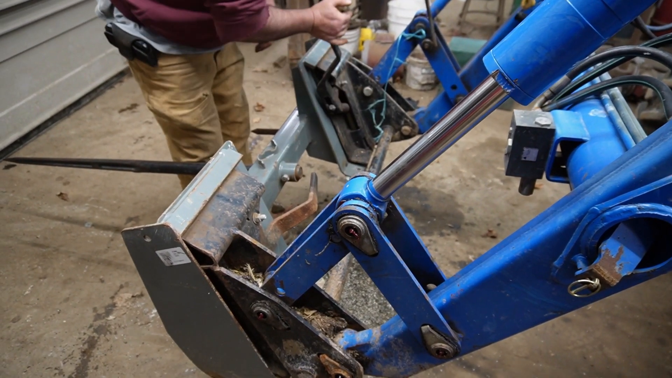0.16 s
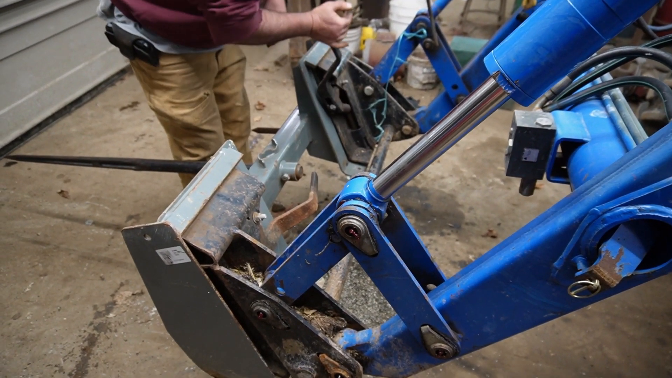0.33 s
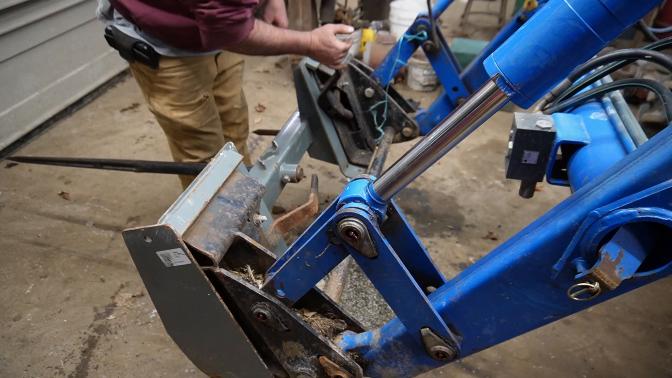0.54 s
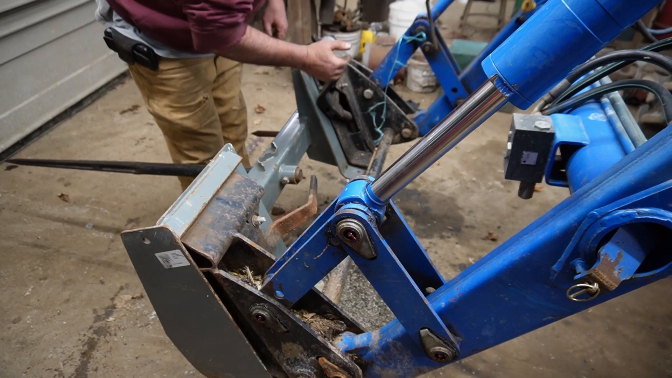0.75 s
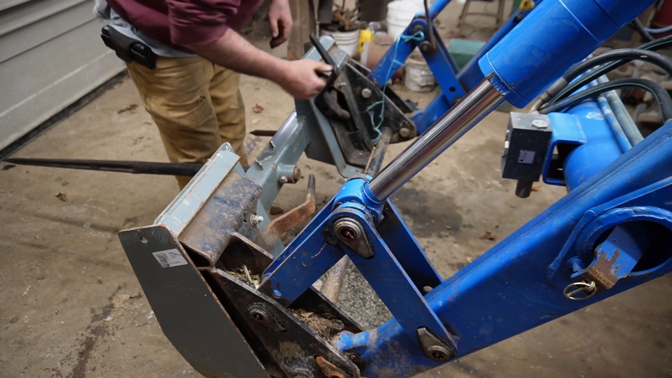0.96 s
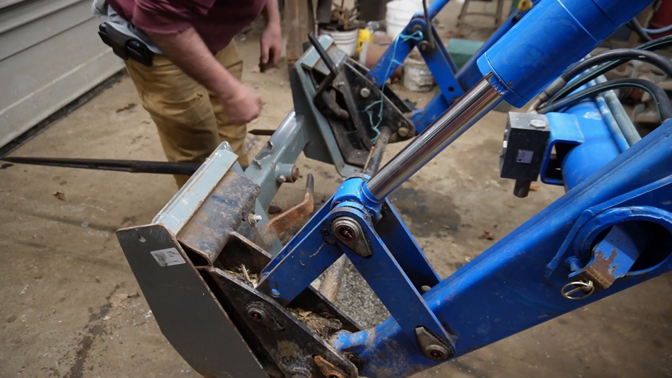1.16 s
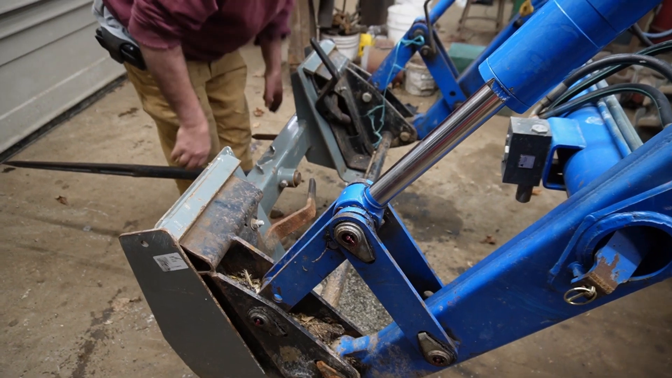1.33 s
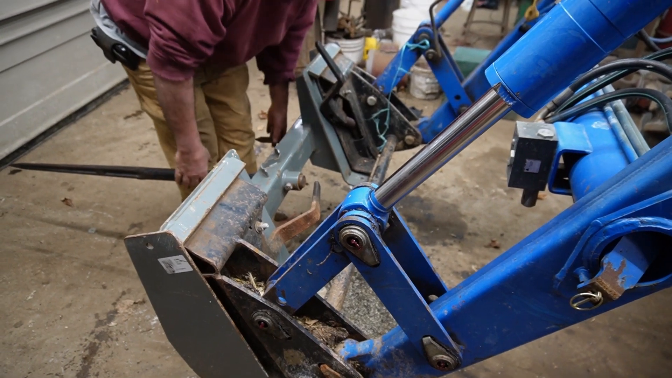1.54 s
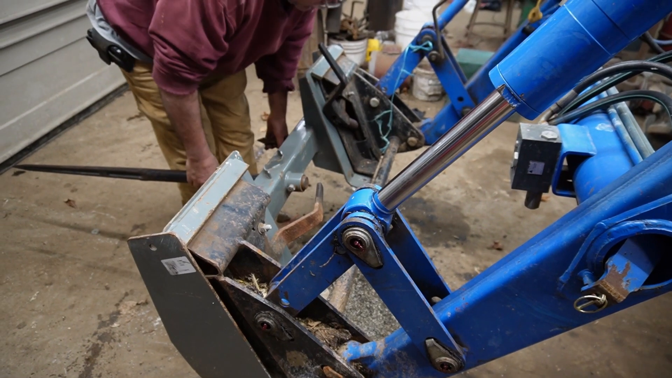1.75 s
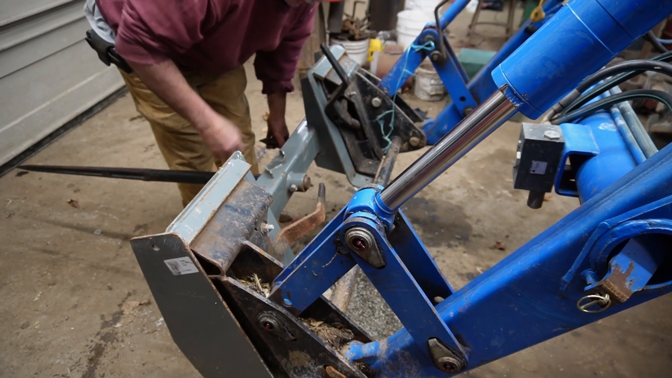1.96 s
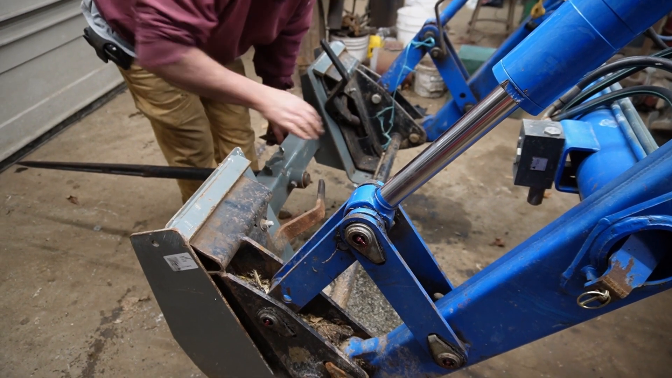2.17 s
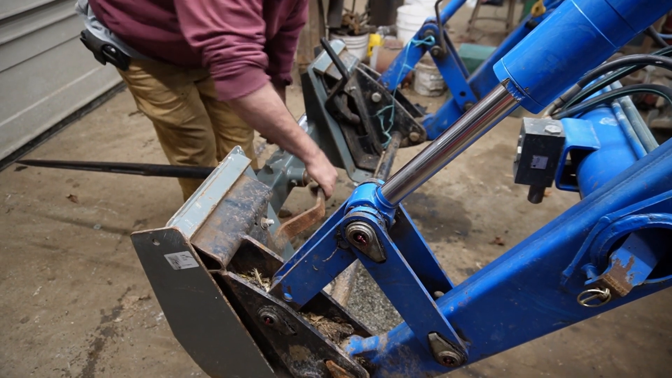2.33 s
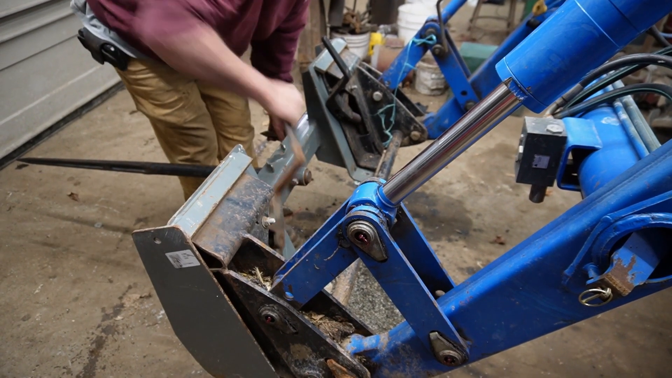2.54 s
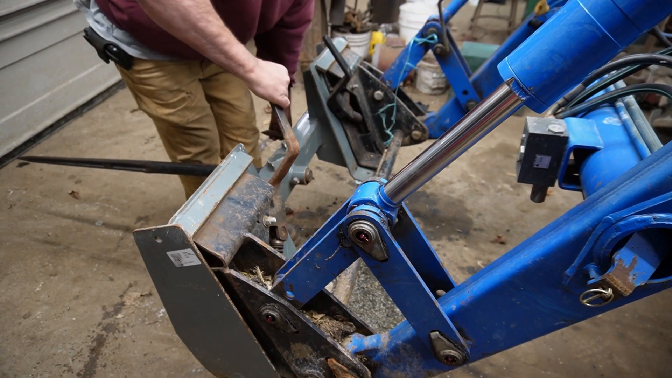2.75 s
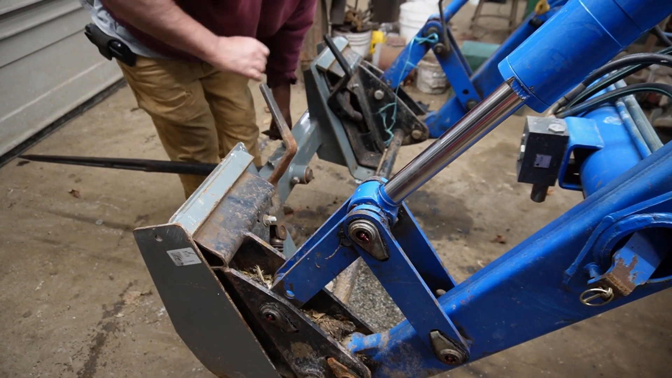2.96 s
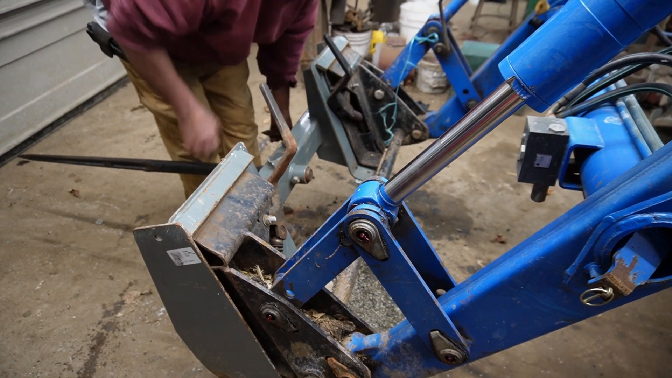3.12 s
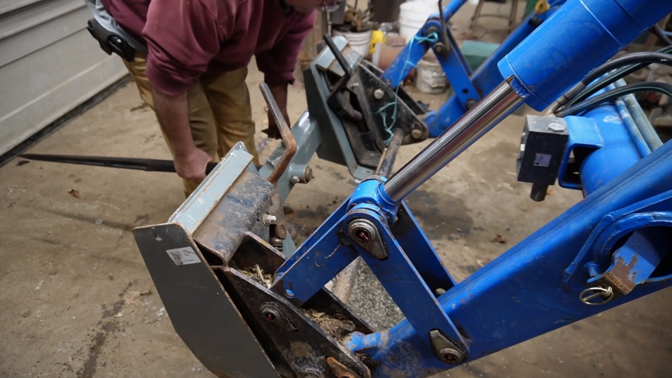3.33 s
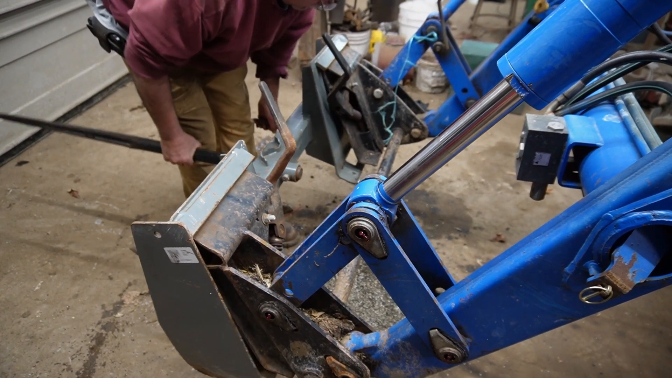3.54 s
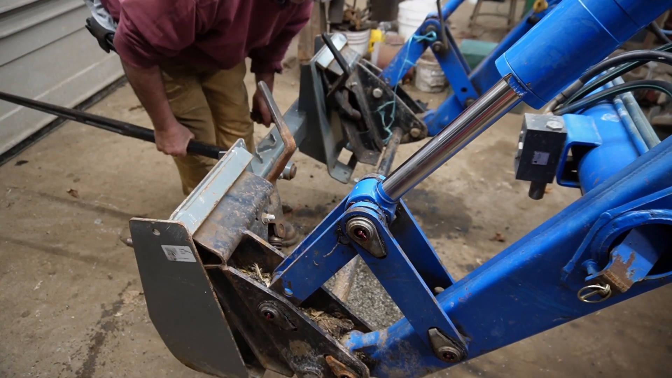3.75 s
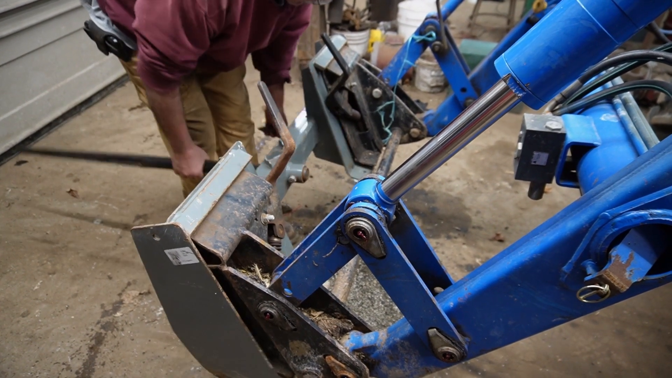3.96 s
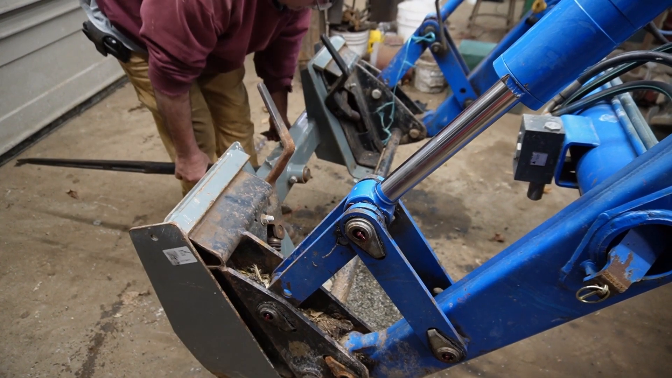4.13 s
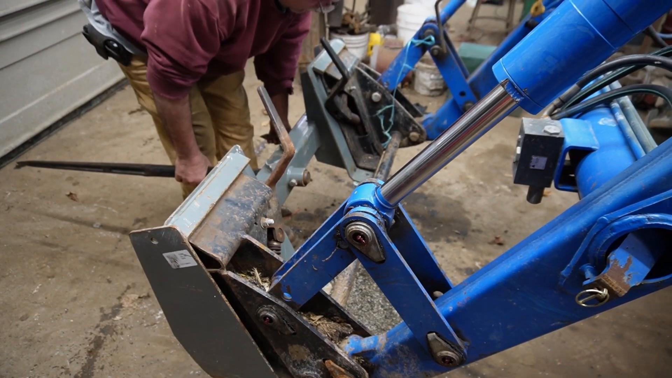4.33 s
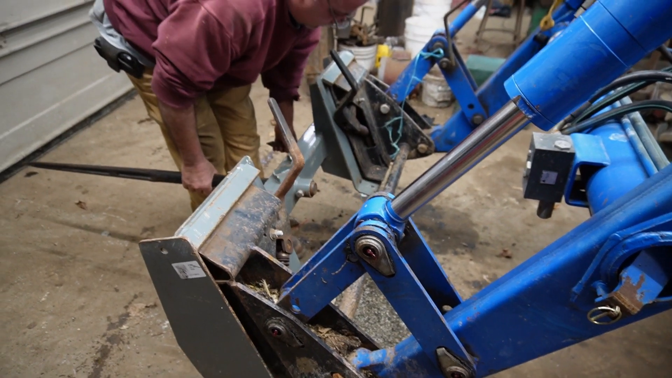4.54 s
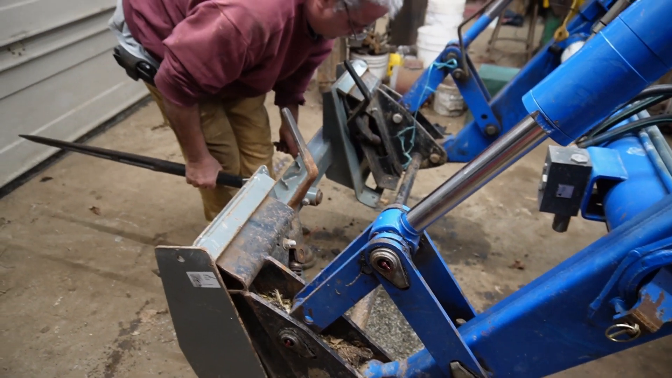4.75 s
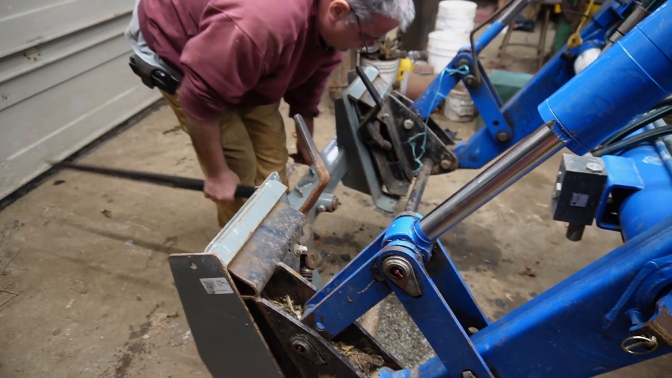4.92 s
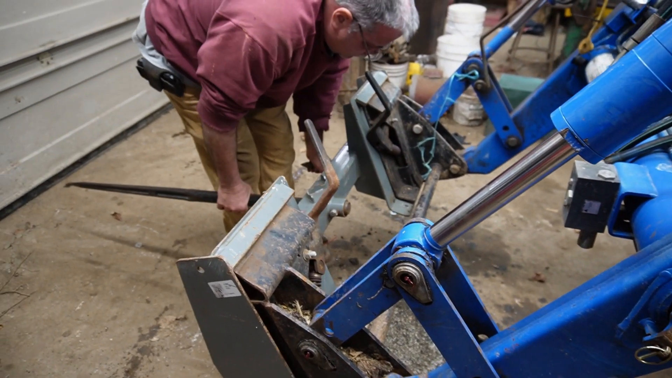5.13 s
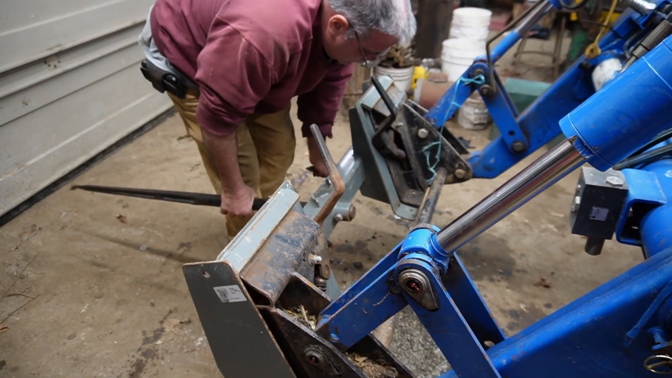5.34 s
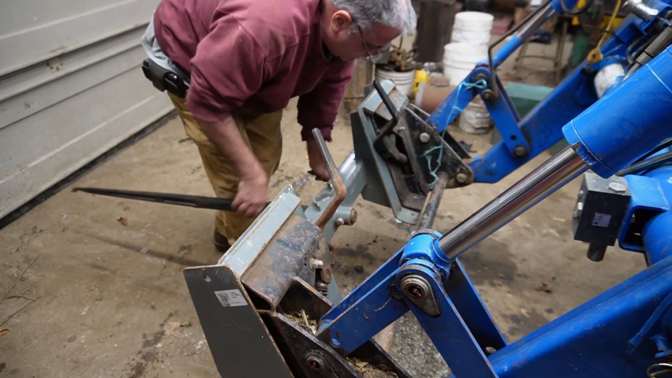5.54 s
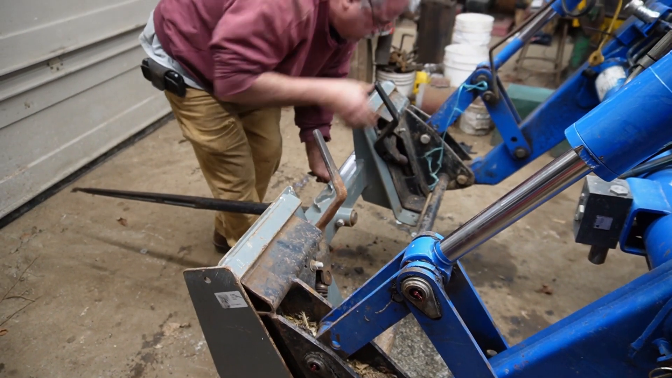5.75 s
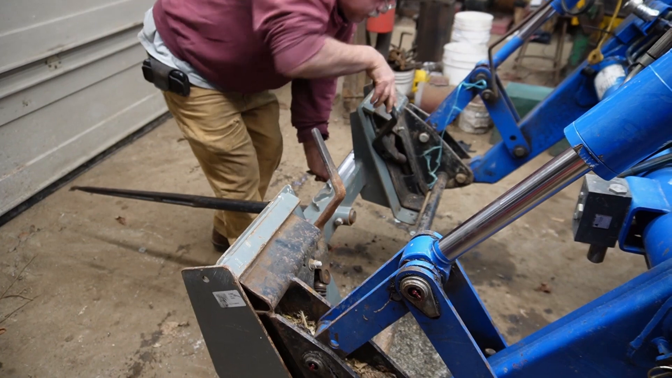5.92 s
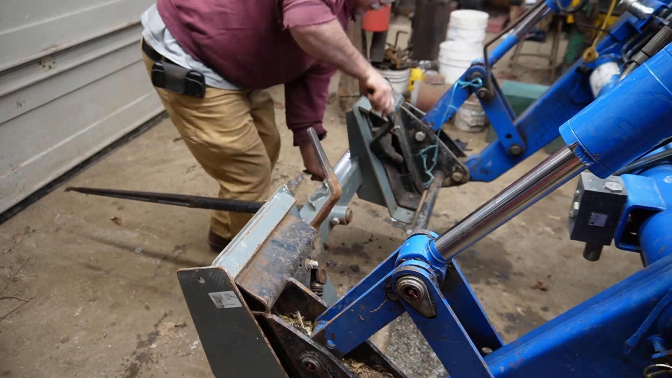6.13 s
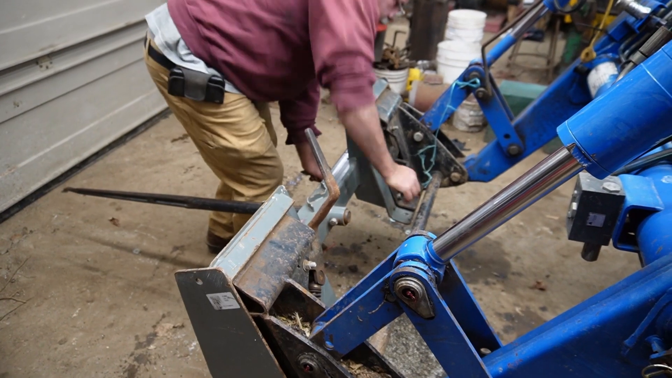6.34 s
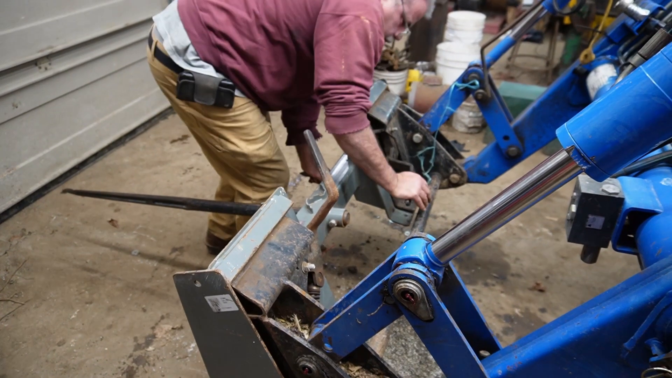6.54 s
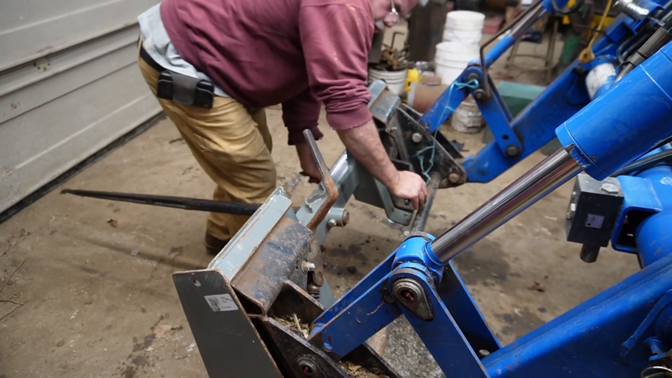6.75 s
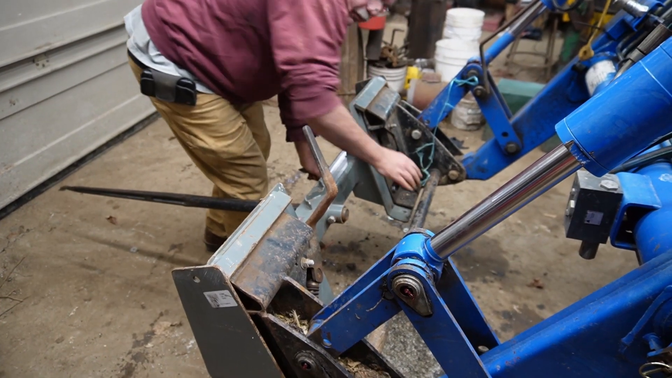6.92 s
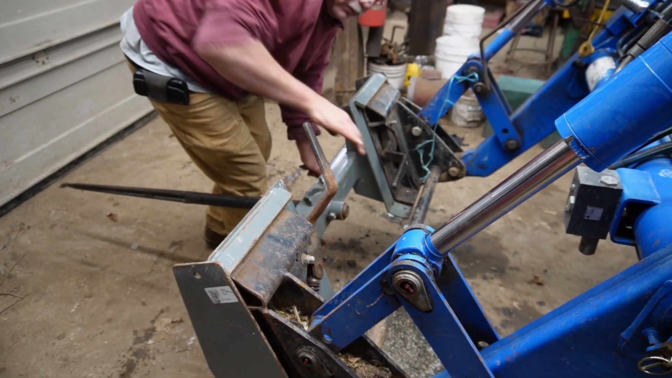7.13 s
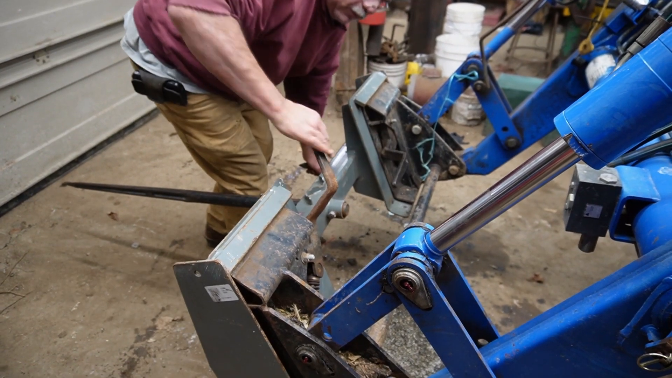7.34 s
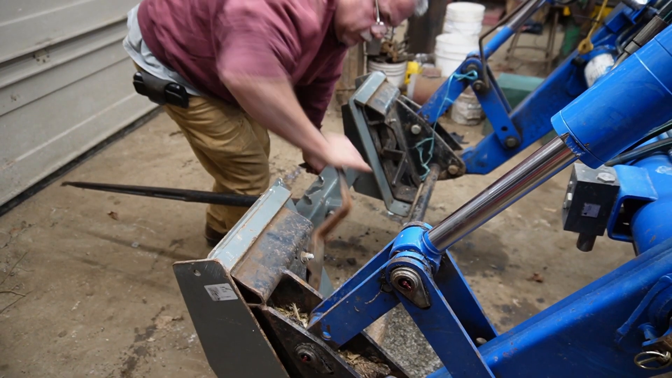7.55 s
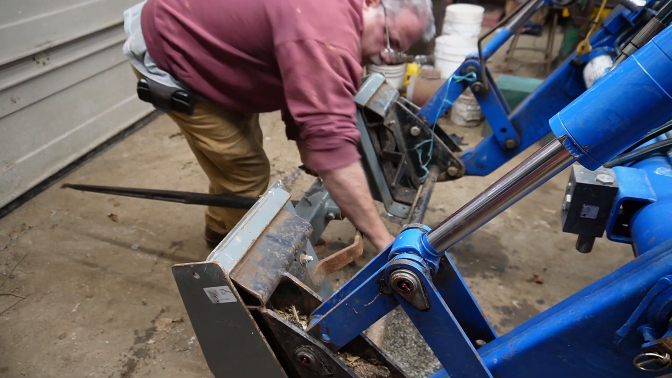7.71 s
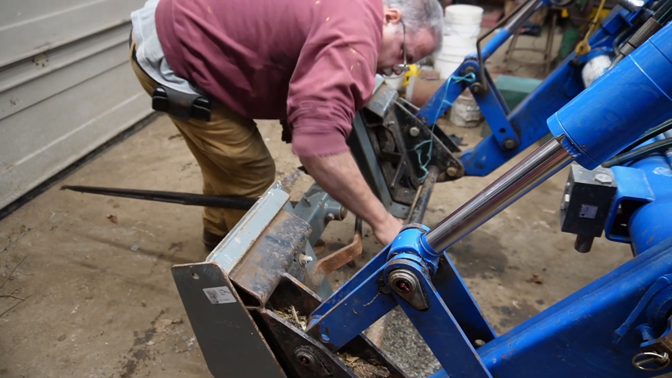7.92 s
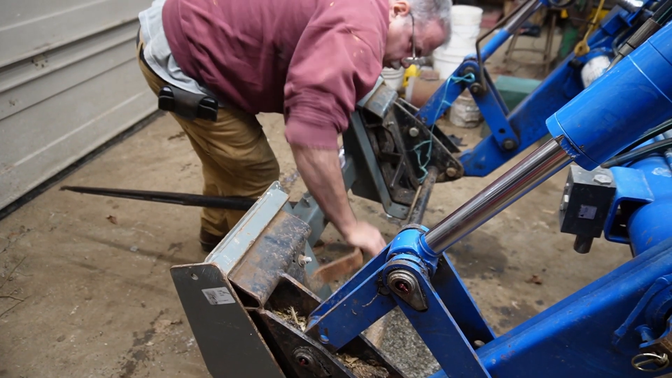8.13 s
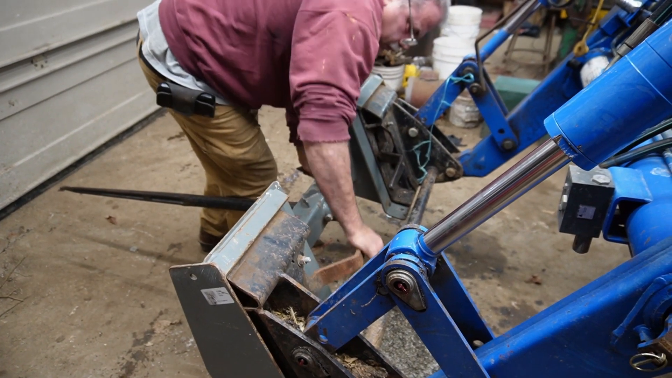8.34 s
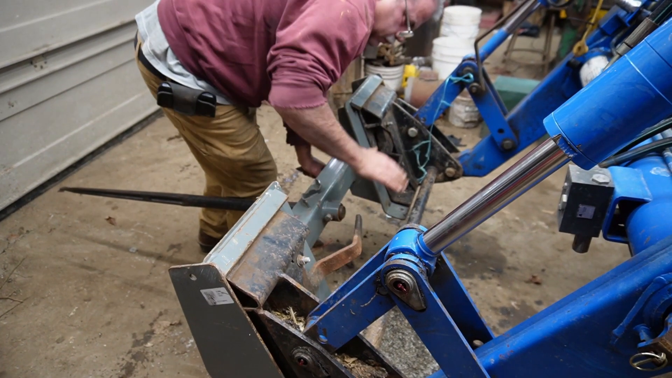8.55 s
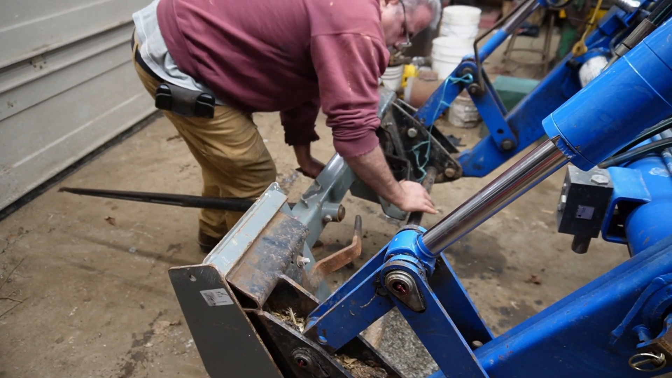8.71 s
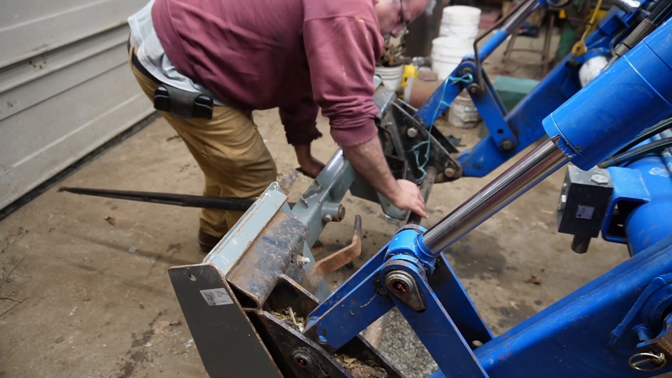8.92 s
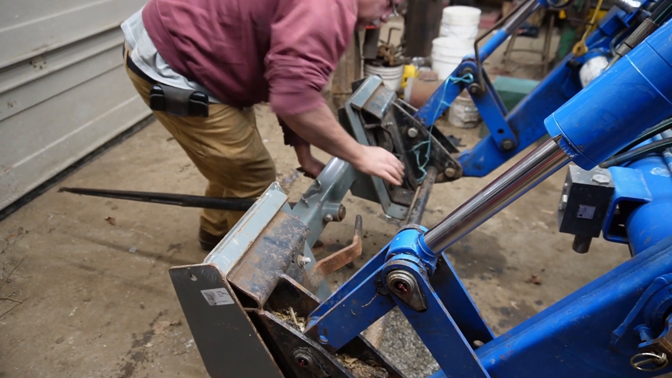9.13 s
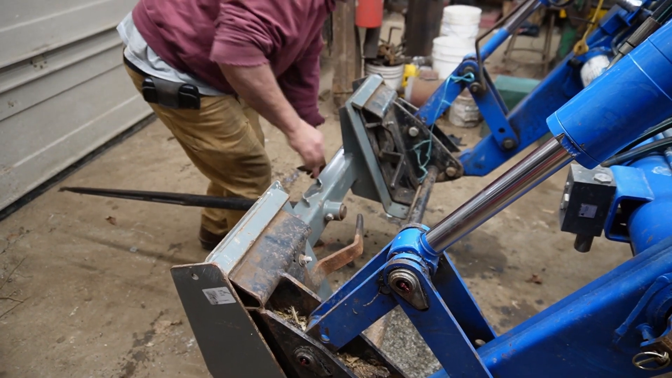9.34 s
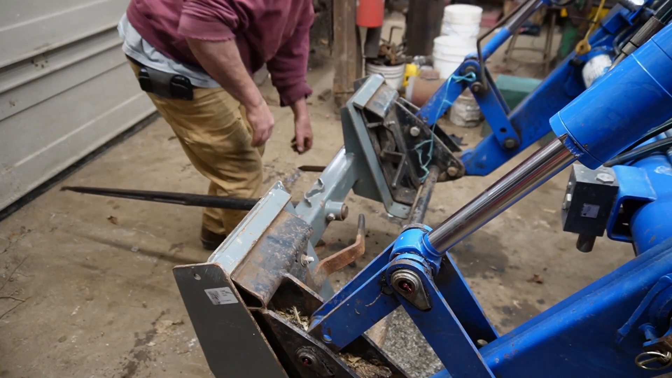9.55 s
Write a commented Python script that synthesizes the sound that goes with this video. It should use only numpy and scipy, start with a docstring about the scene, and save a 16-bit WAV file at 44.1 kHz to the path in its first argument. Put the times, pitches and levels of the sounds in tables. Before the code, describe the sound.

Close mono sound of a loader attachment latch worked by hand in a workshop. Sharp steel clacks with quick bounces come first, then two duller, heavier spear knocks with a low metallic note, a short gritty scuff, and further rattling lever snaps with brief dry slides. Each blow rings briefly off hard walls; quiet hum and hiss fade midway, leaving near silence between small final clicks.

```python
"""Steel levers snap over with rattling bounces, and a bale spear twice falls against its frame.
The hard garage rings after each blow, over a soft hiss and a mains hum that fade from about halfway.
Blows are short noise bursts plus the decaying notes of the steel and a noisy room ring.
Slides, a boot scuff and the hiss are coloured noise; clear notes and the hum are sine waves,
and the hum also has a low drone of coloured noise."""
import sys
import numpy as np
from scipy import signal
from scipy.fft import rfft, irfft, next_fast_len
from scipy.io import wavfile
from scipy.ndimage import uniform_filter1d

SR = 44100
rng = np.random.default_rng(int(sys.argv[2]) if len(sys.argv) > 2 else 0)


def int16_out(signal):
    """Quantize to a 16-bit WAV file."""
    q = np.round(np.clip(np.atleast_2d(signal).T, -1, 1) * 32767)
    wavfile.write(sys.argv[1], SR, q.astype(np.int16))


N = 426788  # length in samples


def amp(db):
    """Turn decibels into gain: every 20 dB is a factor of ten."""
    return 10 ** (np.asarray(db) / 20)


def unit(x):
    """Scale to rms 1, so that a later gain sets the level."""
    return x / np.sqrt(np.mean(x ** 2) + 1e-20)


def along(points, hz):
    """Read a curve of (f/Hz, value) points, with straight lines on a logarithmic frequency axis."""
    f, value = np.transpose(points)
    return np.interp(np.log(hz + 1), np.log(f + 1), value)


def add(track, s, sound):
    """Mix a sound into the track at time s in seconds."""
    start = max(0, round(s * SR))
    space = max(0, len(track) - start)
    track[start:start + len(sound)] += sound[:space]


def noise(spectrum):
    """Make steady noise of rms 1 by shaping the spectrum of random samples."""
    size = next_fast_len(N)
    gain = amp(along(spectrum, np.fft.rfftfreq(size, 1 / SR)))
    white = rng.standard_normal(size)
    return unit(irfft(rfft(white) * gain, size)[:N])


def coloured(x, gain):
    """Filter x with a gain at each frequency bin, without sound leaking ahead of its cause."""
    cepstrum = irfft(np.log(np.maximum(gain, 1e-6)), len(x))
    # folding the cepstrum onto positive times gives the minimum-phase filter
    cepstrum[1:len(x) // 2] *= 2
    cepstrum[len(x) // 2 + 1:] = 0
    return irfft(rfft(x) * np.exp(rfft(cepstrum)), len(x))


def stroke(start, length, db, rise_db_per_s, fall_db_per_s):
    """Shape one rub: the gain rises to db at start, holds for length seconds and dies away."""
    t = np.arange(N) / SR - start
    rise = rise_db_per_s * np.maximum(-t, 0)
    fall = fall_db_per_s * np.maximum(t - length, 0)
    return amp(db - rise - fall)


def reverberation():
    """Make one second of the room's ring from noise that decays separately at each frequency."""
    # time for the room to die by 60 dB: (f/Hz, t60/s)
    garage = [(60, 0.54), (200, 0.41), (450, 0.39), (1500, 0.34), (3000, 0.33), (6000, 0.3), (10000, 0.24),
              (16000, 0.3)]
    hz, t, z = signal.stft(rng.standard_normal(SR), SR, nperseg=256)
    decay = amp(-60 * t / along(garage, hz)[:, None])
    return signal.istft(z * decay, SR, nperseg=256)[1][:SR]


def ring(modes, t, scatter_db, waver):
    """Sum the steel's decaying notes, newly scattered in strength; reflections make each one waver."""
    knots = np.arange(40) / 39  # s
    out = np.zeros(len(t))
    for hz, db, t60 in modes:
        wander = np.interp(t, knots, waver * rng.standard_normal(len(knots)))  # radians
        phase = rng.uniform(0, 2 * np.pi) + wander
        strength_db = db + scatter_db * rng.standard_normal()
        out += amp(strength_db - 60 * t / t60) * np.sin(2 * np.pi * hz * t + phase)
    return out


def clanks(contacts, modes, snap_db, crack_db, crack_t60, ring_db, room_db, knock_db, body_db,
           bite_db, edge_db, favour_db, uneven_db, thud_db, boom_db):
    """Build each blow from a snap with echoes and a rebound, a crack, the steel's ring and the room."""
    # colour of a steel-on-steel clash: (f/Hz, relative level per Hz/dB)
    clash = [(30, -20.5), (110, -24), (220, -17), (330, -11), (450, -3.5), (850, -4), (1100, 2),
             (2400, -1.5), (3200, -8.5), (5200, -12), (6300, -17), (9000, -19.5), (12000, -27),
             (16000, -36)]
    # the first instant is the brightest: (f/Hz, gain/dB)
    first_instant = [(300, -13.5), (2000, -3), (5000, 0.5), (9000, 3)]
    # direct sound, then echoes off the floor and the machine: (typical delay/s, gain/dB)
    echoes = [(0, 0.5), (.0058, -2.5), (.0095, -6), (0.018, -13.5)]
    rebound_s, rebound_db = 0.009, -8  # each blow bounces once, after about this time
    thud_grows = 0.36  # dB of frame thud per dB of blow above a middling one
    body_per_weight = 0.5  # dB near 1 kHz per dB of weight
    bite_per_hardness = 0.64  # dB near 4 kHz per dB of hardness
    track, t, hz = np.zeros(N), np.arange(SR) / SR, np.fft.rfftfreq(SR, 1 / SR)
    steel = unit(amp(along(clash, hz)))
    for s, db, weight, hardness, favoured_hz in contacts:
        snap = np.zeros(SR)
        burst = amp(snap_db - 60 * t / 0.0085) * rng.standard_normal(SR)
        for delay, echo_db in echoes:
            add(snap, delay * rng.uniform(0.85, 1.15), amp(echo_db) * burst)
        # the treble leaves the contact at once, the lower notes spread through the steel first
        snap = coloured(snap, steel * amp(along(first_instant, hz)))

        crack = amp(crack_db - 60 * t / crack_t60) * rng.standard_normal(SR)
        room = amp(room_db) * reverberation() * (1 - np.exp(-t / 0.0063))
        notes = amp(ring_db) * ring(modes, t, scatter_db=4, waver=0.46)
        after = coloured(crack + room, steel) + notes
        blow = snap + after * (1 - np.exp(-t / 0.0005))

        # heavy contacts push more bass, hard ones more treble; louder blows shake the frame more
        bass = weight + knock_db
        touch = [(70, thud_db + thud_grows * (db + 18.5)),
                 (220, bass + boom_db),
                 (550, bass),
                 (1050, body_per_weight * weight + body_db),
                 (1700, 0.0014), (2600, 0.002),  # nearly unchanged here
                 (4400, bite_per_hardness * hardness + bite_db),
                 (9000, hardness + edge_db)]
        # the point of contact favours one group of resonances
        favour = favour_db / (1 + (np.log((hz + 1) / favoured_hz) / 0.09) ** 2)
        # and it excites the many weaker ones unevenly, more so towards the treble
        bumps = uniform_filter1d(rng.standard_normal(len(hz)), size=170)
        bumps = unit(uniform_filter1d(bumps, size=110))
        uneven = uneven_db * bumps * hz / (hz + 900)
        colour = amp(db + along(touch, hz) + favour + uneven)
        add(track, s, coloured(blow, colour))
        bounce = amp(rebound_db) * coloured(snap, colour)
        add(track, s + rebound_s * rng.uniform(0.7, 1.3), bounce)
    return track


def rings(events, modes, swell_s):
    """Let a part that is free after a blow swell into its own few notes and sing on."""
    track, t = np.zeros(N), np.arange(SR) / SR
    for s, db in events:
        swell = 1 - np.exp(-t / swell_s)
        add(track, s, amp(db) * swell * ring(modes, t, scatter_db=0.5, waver=0.26))
    return track


def background():
    """Mix sinking room hiss, an electrical hum of sines with a low noise drone, and steady faint noise."""
    # colour of the room hiss: (f/Hz, relative level per Hz/dB)
    hiss_colour = [(100, -7), (280, 2), (450, -2.5), (900, -2.5), (1500, -6.5), (2400, -7.5), (3500, -17),
                   (5500, -21), (8000, -34), (11000, -47.5), (15500, -44.5)]
    # notes of the hum: (f/Hz, rms level before the shared hum gain/dB)
    hum_notes = [(120, -69), (240, -80), (269, -77), (360, -73.5)]
    # colour of the low drone: (f/Hz, relative level per Hz/dB)
    drone_colour = [(20, -11.5), (70, -10), (150, -1), (280, 4.5), (400, -13), (700, -21), (3000, -66)]
    # colour of the steady faint noise: (f/Hz, relative level per Hz/dB)
    still_colour = [(20, -6.5), (45, -6.5), (90, -18), (400, -21.5), (3000, -16.5), (12000, -31),
                    (16000, -34)]
    fade_s = 4.45  # hiss and hum start to sink at this time
    hiss_start_db, hiss_sink_db, hiss_sink_s = -60, 18.5, 0.9
    hum_gain_db, hum_drop_db, hum_drop_s, hum_fade_db_per_s = 5.5, 15, 0.09, 15
    t = np.arange(N) / SR
    since = np.maximum(t - fade_s, 0)
    # the hum drops quickly at first and then fades steadily
    hum_db = hum_gain_db - hum_drop_db * (1 - np.exp(-since / hum_drop_s)) - hum_fade_db_per_s * since
    hiss_db = hiss_start_db - hiss_sink_db * (1 - np.exp(-since / hiss_sink_s))
    hum = np.zeros(N)
    for hz, db in hum_notes:
        phase = rng.uniform(0, 2 * np.pi)
        hum += np.sqrt(2) * amp(db) * np.sin(2 * np.pi * hz * t + phase)
    machine = amp(hum_db) * (hum + amp(-69.5) * noise(drone_colour))
    hiss = amp(hiss_db) * noise(hiss_colour)
    return machine + hiss + amp(-74) * noise(still_colour)


def levers():
    """Strike the latch plate with levers and pins, so that its many short notes ring."""
    # lever and pin blows:
    # (t/s, level/dB, weight: bass against treble/dB, hardness/dB, favoured resonance f/Hz)
    latch_blows = [(0.001, -25, -3.5, -9.5, 405), (0.606, -39.5, 4, -10, 3330), (0.615, -42, 7, -1, 1300),
                   (2.45, -41.5, -2, -1, 1400), (2.484, -39.5, -5.5, -1.5, 1420),
                   (2.538, -34, -11, 1, 2430), (2.546, -28, -4, 8, 2280), (2.557, -21.5, -8.5, 11, 2280),
                   (2.564, -15, -13, -7, 1450), (2.623, -18.5, -18.5, 1, 2540),
                   (2.628, -16, -7.5, -9, 2220), (2.642, -20.5, -1, 3.5, 2210), (2.862, -28, -3, 1.5, 2040),
                   (6.1, -61.5, 5, -1.5, 1243), (6.151, -54.5, 9, -2, 647), (6.169, -42, 4.5, -3, 1204),
                   (6.209, -34.5, 2, -12, 1220), (6.245, -39, 5.5, 3, 1250), (6.271, -23.5, 1.5, 2.5, 2180),
                   (6.277, -20, -0.5, -2.5, 1070), (6.283, -27, -6, 14.5, 1670),
                   (6.348, -15, -14.5, 6.5, 1940), (6.374, -21.5, -1, -1, 1660),
                   (6.421, -26.5, 1.5, -9.5, 2550), (6.911, -42.5, 4, 1.5, 2100),
                   (6.941, -29.5, -7.5, -2, 2430), (6.961, -37.5, -6, 9, 2580), (7.419, -41, 0, -7.5, 2290),
                   (7.424, -30.5, -5.5, -15.5, 2316), (7.572, -36, -2, 11.5, 1090),
                   (7.621, -19.5, -3, -1.5, 1050), (7.661, -25, -4, -0.5, 1750), (7.667, -14, -12, 1, 1730),
                   (7.674, -21.5, 3, 4.5, 900), (7.7, -22, 0.5, 3, 3000), (7.741, -17, -4, 4.5, 1100),
                   (8.152, -33.5, -6.5, -11.5, 1280), (8.173, -32.5, 0, 0, 1750),
                   (8.184, -46.5, 13, 11, 1080), (8.39, -41.5, 2, -10.5, 1710), (8.427, -39, 3, 3, 2680),
                   (8.453, -32, 3, -10, 2440), (8.477, -22, -3.5, 0.5, 1080), (8.7, -39, 0, 6, 1150),
                   (8.706, -28, 2, 4.5, 1500), (8.744, -31, 5.5, -12.5, 630), (8.984, -46, 4.5, -18, 1500),
                   (9.008, -44, -1, -11.5, 1860), (9.026, -31.5, -0.5, 3.5, 2390),
                   (9.084, -36.5, 1.5, 1, 1420)]
    # ring of the latch plate: (f/Hz, typical level before the ring gain/dB, t60/s)
    plate_modes = [(420.5, -6, 0.45), (517, -2.5, 0.42), (588, -2.5, 0.36), (773, -2, 0.32),
                   (1038, 2.5, 0.25), (1086, -8, .4), (1137, -6, 0.48), (1228, -4, 0.27),
                   (1430, -0.5, 0.32), (1486, -5.5, .4), (1677, 1.5, 0.26), (1810, -3, 0.3),
                   (2146, 1, 0.23), (2152, -6, 0.28), (2280, -7.5, 0.39), (2380, -0.5, 0.28),
                   (2473, -1, 0.27), (2575, -5.5, 0.28), (2964, -5, 0.29), (3144, -9, 0.3),
                   (3480, -7.5, .3), (3730, -8, 0.21), (4260, -13.5, 0.19), (4900, -10, 0.26),
                   (5280, -8.5, .22), (5460, -8.5, .25), (6740, -14.5, 0.32), (8930, -15.5, .18)]
    return clanks(latch_blows, plate_modes, snap_db=4.0, crack_db=-2, crack_t60=0.12, ring_db=-16.5,
                  room_db=-4.0, knock_db=1, body_db=1, bite_db=0.5, edge_db=-7.5, favour_db=5,
                  uneven_db=2.0, thud_db=-5.5, boom_db=0)


def slides():
    """Rub dry steel on steel: coloured noise whose level flickers as the surfaces catch unevenly."""
    # a pin or lever slides in its guide: (start t/s, length/s, level before the flicker/dB)
    slide_times = [(0.433, 0.15, -57), (5.646, 0.42, -70.5), (6.891, .06, -64), (7.544, 0.056, -53),
                   (7.956, 0.075, -55.5), (8.971, 0.2, -58.5), (9.257, .18, -71.5)]
    # colour of the rubbing: (f/Hz, relative level per Hz/dB)
    rub_colour = [(100, -37), (450, -3.5), (1100, -4.5), (1700, 0.5), (2300, -1), (3200, -11.5),
                  (5200, -15), (8000, -32), (11500, -33.5), (16000, -36)]
    catches = unit(uniform_filter1d(rng.standard_normal(N), size=400))
    strokes = np.zeros(N)
    for s, length, db in slide_times:
        strokes += stroke(s, length, db, rise_db_per_s=278, fall_db_per_s=107)
    return strokes * amp(1.5 * catches) * noise(rub_colour)


def singing_levers():
    """Let a lever left free after a blow sing at its own few long notes."""
    # moments when a lever is left free: (t/s, gain/dB)
    freed = [(2.629, -41), (2.862, -44), (6.35, -40.5), (7.741, -39.5)]
    # notes of a free lever: (f/Hz, typical level before the event gain/dB, t60/s)
    lever_modes = [(557, -14, 0.77), (1450, -4, 1), (1688, -4.5, 0.86), (1755, -3, 1.1)]
    return rings(freed, lever_modes, swell_s=0.008)


def spear():
    """Knock the spear against its frame, with heavier blows and lower notes than the levers."""
    # spear blows: (t/s, level/dB, weight: bass against treble/dB, hardness/dB, favoured resonance f/Hz)
    spear_blows = [(3.503, -42.5, 8, -10, 1006), (3.541, -48.5, 11.5, -0.5, 647),
                   (3.974, -28, 4, -1.5, 510), (3.989, -31, -1, -3.5, 1390),
                   (4.03, -17.5, -4.5, -7.5, 1820), (4.042, -18.5, -13.5, 8, 1460),
                   (4.075, -31.5, 0, 12.5, 1070), (4.45, -46.5, -3.5, -3, 1115),
                   (4.693, -29.5, 3, -4, 1375), (4.967, -48, 8, -11, 1000), (4.996, -33.5, -0.5, -9, 680),
                   (5.008, -16, -7.5, -11.5, 1873), (5.018, -19.5, -5, 10, 1700),
                   (5.059, -28.5, -10, 8.5, 1090)]
    # ring of the spear and its frame: (f/Hz, typical level before the ring gain/dB, t60/s)
    frame_modes = [(400, -14, .3), (408, -4.5, 0.26), (485, -5.5, 0.28), (664, -4.5, 0.45), (745, -6, .33),
                   (841, -6, .3), (976, -4, 0.19), (1077, -4, 0.36), (1207, -8.5, 0.36), (1353, -5, 0.26),
                   (1507, -8.5, 0.41), (1630, -11, .38), (1820, -1, 0.27), (2150, -8.5, 0.41),
                   (2296, -1, .34), (2509, -11, .3), (3470, -16.5, .22), (4544, -15, .22)]
    return clanks(spear_blows, frame_modes, snap_db=-1, crack_db=-7.5, crack_t60=0.17, ring_db=-13.5,
                  room_db=-1.5, knock_db=8.0, body_db=5, bite_db=-1, edge_db=-13.5, favour_db=3.5,
                  uneven_db=4.5, thud_db=0.5, boom_db=-2)


def singing_spear():
    """Let the spear sing at its bending notes as it settles in its socket."""
    # moments when the spear settles: (t/s, gain/dB)
    landings = [(3.525, -31.5), (4.068, -16), (5.046, -11)]
    # bending modes of the spear: (f/Hz, typical level before the event gain/dB, t60/s)
    spear_modes = [(416.6, -1, .24), (457, -15, 0.42), (1083, -25, 0.82)]
    return rings(landings, spear_modes, swell_s=0.01)


def pings():
    """Touch steel lightly so that it rings at one clear note; the higher the note, the shorter."""
    # light touches: (t/s, f/Hz, typical gain/dB)
    touches = [(4.449, 1096, -44), (4.452, 1450, -41.5), (4.692, 1262, -29.5), (8.162, 5490, -34)]
    ping_cycles = 370  # a note dies by 60 dB in this many cycles
    track = np.zeros(N)
    for s, hz, db in touches:
        track += rings([(s, db)], [(hz, 0, ping_cycles / hz)], swell_s=0.003)
    return track


def scuff():
    """Drag a boot sole over gritty concrete: a burst of coloured noise with a sudden start."""
    # colour of the grit: (f/Hz, relative level per Hz/dB)
    grit_colour = [(88, -50), (150, -18), (213, -9.5), (339, -15), (420, -14), (481, -19), (519, -8.5),
                   (930, -12.5), (1540, -1.5), (15500, -36)]
    drag = stroke(start=5.35, length=0.11, db=-49, rise_db_per_s=3500, fall_db_per_s=158)
    return drag * noise(grit_colour)


def scene():
    """Mix levers, spear and boot in the garage into one channel."""
    blows = levers() + spear()
    singing = singing_levers() + singing_spear() + pings()
    return (blows + singing + slides() + scuff() + background())[None]


def record(dry):
    """Remove all frequencies from the band limit upwards."""
    top_hz = 15850
    size = next_fast_len(N + SR)
    keep = np.fft.rfftfreq(size, 1 / SR) < top_hz
    return irfft(rfft(dry, size) * keep, size)[..., :N]


dry = scene()
out = record(dry)
int16_out(out)
```